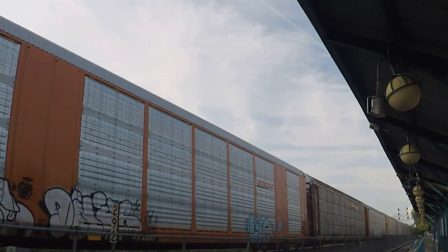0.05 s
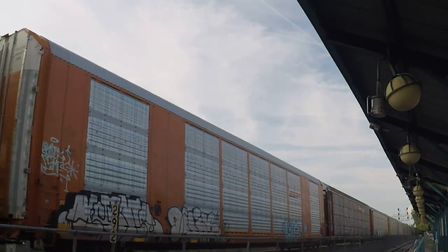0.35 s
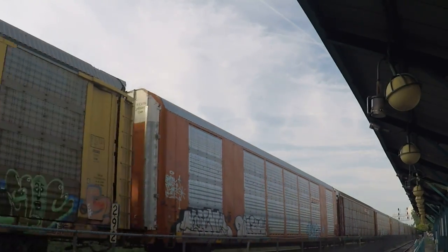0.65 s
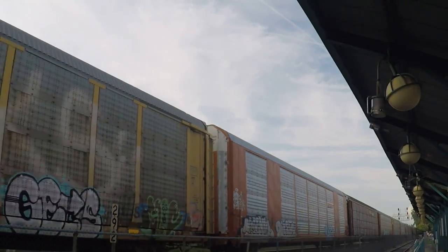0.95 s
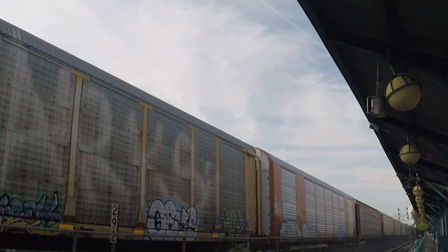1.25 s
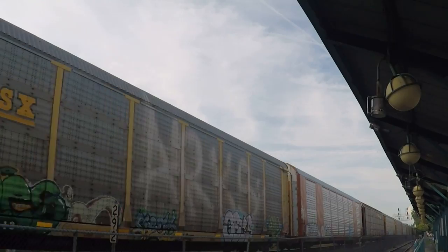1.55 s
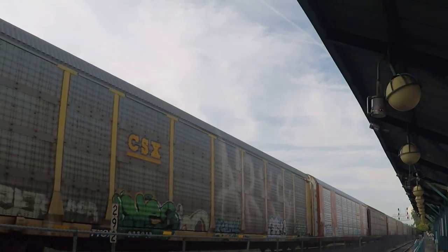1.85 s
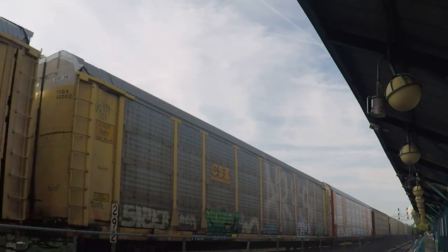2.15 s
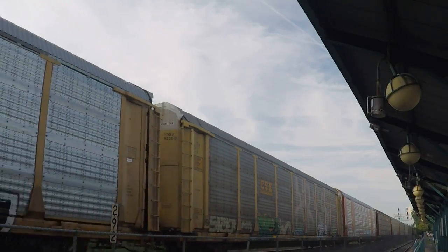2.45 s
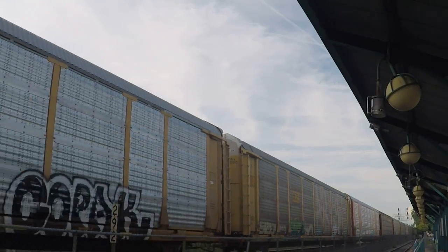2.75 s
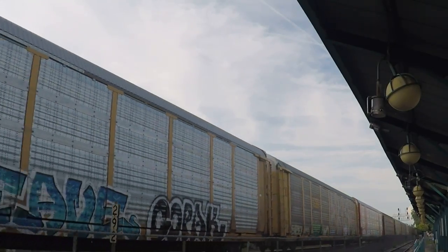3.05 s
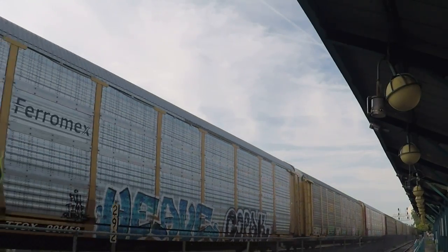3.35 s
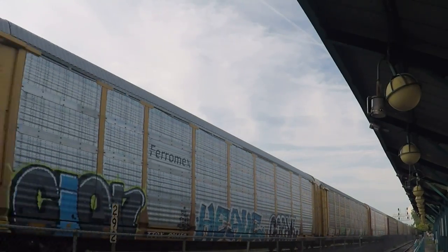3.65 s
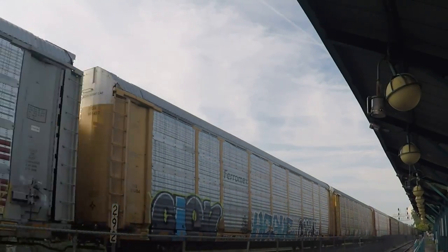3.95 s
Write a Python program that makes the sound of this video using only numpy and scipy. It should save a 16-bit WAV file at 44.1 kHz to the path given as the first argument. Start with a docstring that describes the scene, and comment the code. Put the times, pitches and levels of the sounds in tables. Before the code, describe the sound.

Freight wagons roll by with a low rumble and rapid, rhythmic metallic wheel thumps.

```python
"""A freight train of car carriers rolls past a platform: wagons rumble, wheels and rails roar.
First a flat-spotted wheel pounds the rail once a turn and moves away; each blow booms, knocks in
the bogie, clangs and rattles. From 1.8 s a flange rubs and sings faintly. From 2.3 s a second flat
wheel draws near. Around 3.2 s it is abreast: its disc rings, one blow zings, wagon panels hum."""
import sys
import numpy as np
from scipy import signal
from scipy.fft import rfft, irfft, next_fast_len
from scipy.io import wavfile
from scipy.ndimage import uniform_filter1d, map_coordinates

SR = 44100
rng = np.random.default_rng(int(sys.argv[2]) if len(sys.argv) > 2 else 0)


def transcribe(u):
    """Save the signal u as a 16-bit wav file named by the first command-line argument.

    u: samples, shape (n,) or (channels, n), limited to [-1, 1]; the rate is SR.
    q: integer samples, one column per channel.
    """
    v = np.clip(np.atleast_2d(u).T, -1, 1)
    q = np.round(v * 32767).astype(np.int16)
    wavfile.write(sys.argv[1], SR, q)


N = 176400


def amp(db):
    return 10 ** (np.asarray(db) / 20)


def unit_rms(x):
    return x / np.sqrt(np.mean(x ** 2) + 1e-20)


def unit_blow(x):
    """Scale to the energy of rms 1 over 50 ms."""
    return x / np.sqrt(np.sum(x ** 2) / (SR / 20) + 1e-20)


def curves(rows):
    """Per-sample curve for each column after time_s."""
    time_s, *columns = np.transpose(rows)
    return [np.interp(np.arange(N) / SR, time_s, column) for column in columns]


def wobble(rate_hz, size=N):
    """Smooth random curve, knots at rate_hz."""
    knots = rng.standard_normal(int(size * rate_hz / SR) + 4)
    return map_coordinates(knots, [np.arange(size) * rate_hz / SR])


def coloured(x, spectrum):
    """Minimum-phase filter; spectrum rows: freq_hz, gain_db."""
    size = 2 * next_fast_len(len(x) // 2 + 4096)
    freq_hz, gain_db = np.transpose(spectrum)
    bin_db = np.interp(np.log(np.fft.rfftfreq(size, 1 / SR) + 1), np.log(freq_hz + 1), gain_db)
    cepstrum = irfft(np.log(amp(bin_db)), size)
    cepstrum[1:size // 2] *= 2
    cepstrum[size // 2 + 1:] = 0
    return irfft(rfft(x, size) * np.exp(rfft(cepstrum)), size)[:len(x)]


def rush(spectrum, patchy_db):
    """Coloured noise, rms 1, with random gain patches in time and frequency."""
    bins = signal.stft(rng.standard_normal(N), nperseg=512)[2]
    patches = uniform_filter1d(rng.standard_normal(bins.shape), size=5, axis=0)
    patches = unit_rms(uniform_filter1d(patches, size=12, axis=1))
    noise = signal.istft(bins * amp(patchy_db * patches), nperseg=512)[1][:N]
    return unit_rms(coloured(noise, spectrum))


def add(track, start_s, sound):
    i = max(0, round(start_s * SR))
    track[i:i + len(sound)] += sound[:max(0, N - i)]


def strike(t, attack_s, t60_s):
    """Envelope: smooth rise, exponential decay."""
    rise = np.sin(np.pi / 2 * np.clip(t / attack_s, 0, 1))
    return rise * amp(-60 * np.maximum(t - attack_s, 0) / t60_s)


def swelling(modes, flutter_db, flutter_hz, smear_rad, smear_hz):
    """Driven resonances swell and fade, unsteady in level and phase."""
    out, t = np.zeros(N), np.arange(N) / SR
    for pitch_hz, peak_s, sigma_s, level_db in modes:
        swell = amp(level_db + flutter_db * wobble(flutter_hz))
        swell *= np.exp(-.5 * ((t - peak_s) / sigma_s) ** 2)
        out += swell * np.sin(2 * np.pi * pitch_hz * t + smear_rad * wobble(smear_hz))
    return out


def rolling():
    """Rough treads shake wagons (rumble), bogies (drone) and rails (roar); the last two jolt as one."""
    # rolling noise: time_s, rumble_db, drone_db, roar_db
    levels = [(0, -16, -21, -22.5), (.25, -18, -22.5, -24.5), (.5, -21.5, -27, -27.5),
              (.9, -25.5, -27, -29), (1.3, -26, -29, -30.5), (1.7, -28.5, -31.5, -32),
              (2.2, -27, -29, -31.5), (2.8, -29.5, -30, -34), (3.3, -23.5, -29.5, -33),
              (3.6, -25, -31.5, -31.5), (4, -26.5, -31, -34)]
    # spectra: freq_hz, gain_db
    rumble = [(10, -57), (24, -6), (34, -9.5), (46, -4), (57, 1.5), (78, -4), (105, -9.5), (300, -64.5)]
    drone = [(60, -46), (115, -2), (160, -1), (275, 0), (380, -4.5), (480, -12), (730, -26.5),
             (1200, -53.5)]
    roar = [(300, -20.5), (720, -14), (1050, 3), (1220, -0.5), (1430, 4), (1780, -2.5), (2130, 3),
            (2350, -3.5), (2700, 0), (3100, -5), (3500, 2), (3780, 3.5), (4200, -10.5), (4530, -5.5),
            (5000, -14.5), (6200, -13.5), (6550, -24), (7050, -16), (7450, -31.5), (7900, -19.5),
            (10000, -33.5), (12500, -31.5), (15000, -45)]
    rumble_db, drone_db, roar_db = curves(levels)
    jolt = wobble(28.06)
    return (amp(rumble_db) * rush(rumble, patchy_db=.8)
            + amp(drone_db + .62 * jolt) * rush(drone, patchy_db=.88)
            + amp(roar_db + .52 * jolt + .18 * wobble(220)) * rush(roar, patchy_db=1.1))


def panels():
    """Hollow wagon walls hum briefly as they pass."""
    # wall resonances: pitch_hz, peak_s, sigma_s, level_db
    modes = [(146, 3.07, 0.21, -26.5), (265, 3.39, 0.13, -29)]
    return swelling(modes, flutter_db=5, flutter_hz=20, smear_rad=.77, smear_hz=18)


def flange():
    """A flange rubs the rail: thin hiss, singing wheel modes."""
    # rubbing strength: time_s, level_db
    rub = [(1.82, -80), (1.86, -58), (2.25, -51), (2.45, -56), (2.75, -57), (3.15, -72)]
    # rubbing hiss: freq_hz, gain_db
    spectrum = [(4000, -3), (6000, 5), (7400, -9), (7900, -1), (10000, -13), (12000, -4), (13300, 3),
                (15000, -4)]
    # wheel resonances: pitch_hz, peak_s, sigma_s, level_db
    modes = [(6240, 2.23, .16, -49.5), (6200, 2.2, .14, -52), (7850, 2.4, .22, -57),
             (13716, 2.65, .22, -64), (6300, 3.47, .07, -52)]
    rub_db, = curves(rub)
    hiss = amp(rub_db + .6 * wobble(10)) * rush(spectrum, patchy_db=-2)
    return hiss + swelling(modes, flutter_db=3.5, flutter_hz=30, smear_rad=.78, smear_hz=85)


def boom(starts_s, levels_db, pitch_hz, attack_s, t60_s):
    """The wagon body heaves a few cycles after each blow."""
    out, t = np.zeros(N), np.arange(SR // 3) / SR
    for start_s, level_db in zip(starts_s, levels_db):
        swing = np.sin(2 * np.pi * pitch_hz * (1 + .052 * rng.standard_normal()) * t)
        add(out, start_s, amp(level_db) * unit_blow(swing * strike(t, attack_s, t60_s)))
    return out


def ring(starts_s, levels_db, modes, attack_s, detune, smear_rad, smear_hz):
    """Struck steel modes vary from blow to blow; jolting smears their phase."""
    out, t = np.zeros(N), np.arange(SR // 4) / SR
    for start_s, level_db in zip(starts_s, levels_db):
        blow = np.zeros(len(t))
        draws = rng.standard_normal((len(modes), 3))
        for (pitch_hz, gain_db, t60_s), (gain_draw, pitch_draw, phase_draw) in zip(modes, draws):
            phase = 2 * np.pi * (pitch_hz * (1 + detune * pitch_draw) * t + phase_draw)
            phase += smear_rad * wobble(smear_hz, len(t))
            blow += amp(gain_db + 2 * gain_draw) * strike(t, attack_s, t60_s) * np.sin(phase)
        add(out, start_s, amp(level_db) * unit_blow(blow))
    return out


def chatter(starts_s, levels_db, spectrum, attack_s, t60_s, rough_db):
    """Each blow sets off a dying spray of uneven steel contacts."""
    power, t = np.zeros(N), np.arange(SR // 2) / SR
    envelope = unit_blow(strike(t, attack_s, t60_s))
    for start_s, level_db in zip(starts_s, levels_db):
        add(power, start_s, (amp(level_db) * envelope) ** 2)
    contacts = rng.standard_normal(N) * amp(rough_db * wobble(450))
    return np.sqrt(power) * unit_rms(coloured(contacts, spectrum))


def zing():
    """The nearest blow scrapes the rail: short, gritty, very high."""
    # steel on steel: freq_hz, gain_db
    scrape = [(11000, -30), (13000, 0), (15000, -28)]
    return chatter(starts_s=[3.247], levels_db=[-48], spectrum=scrape, attack_s=.02, t60_s=.17, rough_db=4)


def leaving_wheel():
    """A flat spot's blunt blows recede; the side frame clanks, the disc rings at one double blow."""
    # blows, relative levels: start_s, boom_db, knock_db, clang_db, rattle_db
    blows = [(.075, -26, -26, -27.5, -40), (.215, -32, -27, -34, -38.5), (.35, -28, -24, -23, -38),
             (.488, -25, -15, -27, -39), (.622, -29, -19.5, -27, -39), (.752, -19, -25.5, -31, -43),
             (0.767, -37, -21, -31, -45), (.904, -23, -21.5, -29, -41), (1.044, -24, -25, -30, -41),
             (1.18, -20.5, -25, -31, -41.5), (1.319, -23, -27, -33.5, -49), (1.46, -21, -27.5, -33.5, -46)]
    # modes: pitch_hz, gain_db, t60_s
    bogie = [(165, -3, 0.15), (191.7, -3, 0.048), (239.1, 1.5, 0.18), (306.4, -1.5, 0.1), (334.8, 0, 0.15),
             (394.6, -7, 0.059), (523.4, -14, 0.049)]
    disc = [(3515, -4, 0.27), (3830, -1, .25), (4000, 0, 0.17), (4550, -4, 0.13)]
    # spectra: freq_hz, gain_db
    frame = [(750, -18), (1040, 1), (1600, -7), (4000, -65)]
    clang = [(480, -3), (720, -13), (1100, -5), (1500, 2.5), (1800, -5.5), (2150, -2.5), (3000, -3.5),
             (3800, 2.5), (4400, -14.5), (9000, -49)]  # wheel on rail
    rattle = [(2500, -51), (4500, 9), (5500, 5), (8000, -3.5), (10000, -18), (15000, -34)]  # loose fittings
    sizzle = [(7000, -9), (11500, 0), (15000, -10)]
    start_s, boom_db, knock_db, clang_db, rattle_db = np.transpose(blows)
    sizzle_db = -44 - 15 * start_s  # top treble fades fastest with distance
    return (boom(start_s, boom_db - 2.5, pitch_hz=61, attack_s=.0085, t60_s=.2)
            + ring(start_s, knock_db, bogie, attack_s=.019, detune=.0595, smear_rad=.5, smear_hz=55)
            + chatter(start_s, knock_db - 12.5, frame, attack_s=.012, t60_s=.13, rough_db=2.5)
            + chatter(start_s, clang_db + 1, clang, attack_s=.022, t60_s=.3, rough_db=.5)
            + chatter(start_s, rattle_db + 2, rattle, attack_s=.036, t60_s=.3, rough_db=0)
            + chatter(start_s, sizzle_db, sizzle, attack_s=.033, t60_s=.38, rough_db=2.5)
            + ring(starts_s=[.768], levels_db=[-29], modes=disc,
                   attack_s=.022, detune=.0039, smear_rad=1, smear_hz=250))


def nearing_wheel():
    """A flat spot's sharper blows approach; the disc beams sideways, so it rings most when abreast."""
    # blows, relative levels: start_s, boom_db, boom_lag_s, knock_db, clang_db, rattle_db
    blows = [(2.33, -37, .02, -31, -45, -53), (2.48, -27, -.02, -28, -36.5, -55),
             (2.628, -28, .02, -31, -30.5, -49), (2.789, -24.5, 0.018, -30, -33, -49.5),
             (2.936, -21.5, .028, -24, -29, -46), (3.092, -24.5, 0.0465, -27.5, -29, -45.5),
             (3.241, -22.5, .068, -26.5, -27.5, -44.5), (3.40, -20.5, 0.0247, -26, -29.5, -45),
             (3.553, -22, 0.0242, -23, -30.5, -46), (3.708, -24, .016, -21.5, -30.5, -47.5),
             (3.868, -28.5, .008, -21.5, -29, -46.5)]
    # modes: pitch_hz, gain_db, t60_s
    bogie = [(149.8, 3, 0.3), (204, -0.5, 0.21), (282.5, 0, 0.33), (321, -1.5, 0.31), (386, -2.5, 0.23),
             (445.3, -3.5, 0.21), (545, -13, 0.091)]
    disc = [(2480, 2, 0.22), (2616, -0.5, 0.15), (3360, -0.5, 0.14), (3620, -2, .14)]
    ting = [(6100, 4, 0.3), (10900, -2, .35), (13050, -5, .3)]  # highest disc modes
    # spectra: freq_hz, gain_db
    clang = [(300, -12.5), (480, 0.5), (730, -7.5), (1050, 0), (1550, 3.5), (1950, -1.5), (2550, 1),
             (3050, -1.5), (3650, 6), (4300, -7.5), (9000, -51)]  # wheel on rail
    rattle = [(2500, -18), (4450, -1), (5000, -3), (5300, 1.5), (6150, -1), (6500, -7), (7900, -9.5),
              (10000, -14), (10900, -15.5), (12000, -14), (13100, -14), (15000, -23)]  # loose fittings
    start_s, boom_db, boom_lag_s, knock_db, clang_db, rattle_db = np.transpose(blows)
    abreast_s, fall_db_per_s = 3.225, 43
    disc_db = -27.5 - fall_db_per_s * abs(start_s - abreast_s)
    disc_s = start_s + .004
    return (boom(start_s + boom_lag_s, boom_db + 2.5, pitch_hz=61.7, attack_s=.012, t60_s=.26)
            + ring(start_s, knock_db, bogie, attack_s=.014, detune=.05, smear_rad=.4, smear_hz=40)
            + chatter(start_s, clang_db + 1.5, clang, attack_s=.02, t60_s=.42, rough_db=.5)
            + chatter(start_s, rattle_db + 3.5, rattle, attack_s=.033, t60_s=.37, rough_db=.5)
            + ring(disc_s, disc_db, disc, attack_s=.01, detune=.0094, smear_rad=.96, smear_hz=294)
            + ring(disc_s, rattle_db - 11, ting,
                   attack_s=.012, detune=.0153, smear_rad=1.1, smear_hz=290))


def scene():
    """Mono mix at the platform."""
    return (rolling() + panels() + leaving_wheel() + nearing_wheel() + zing() + flange())[None]


def record(dry):
    """Brick-wall low-pass."""
    cutoff_hz = 15250
    size = next_fast_len(N + SR // 2)
    passband = np.fft.rfftfreq(size, 1 / SR) < cutoff_hz
    return irfft(rfft(dry, size) * passband, size)[..., :N]


dry = scene()
out = record(dry)
transcribe(out)
```